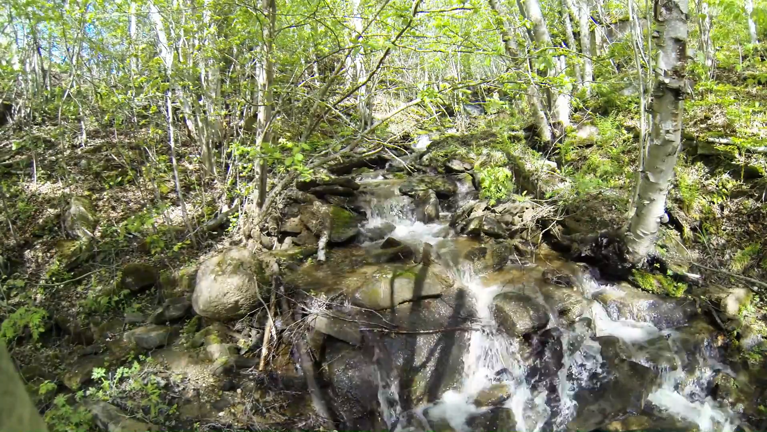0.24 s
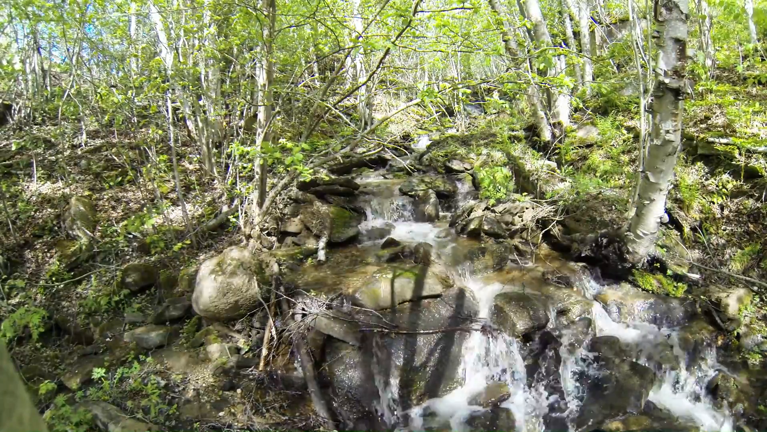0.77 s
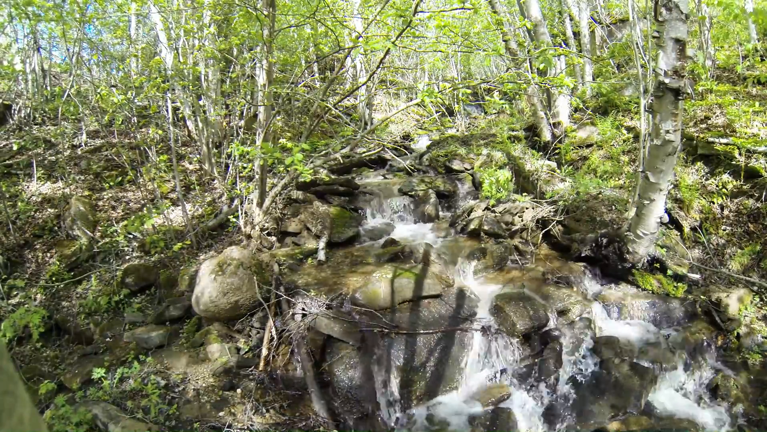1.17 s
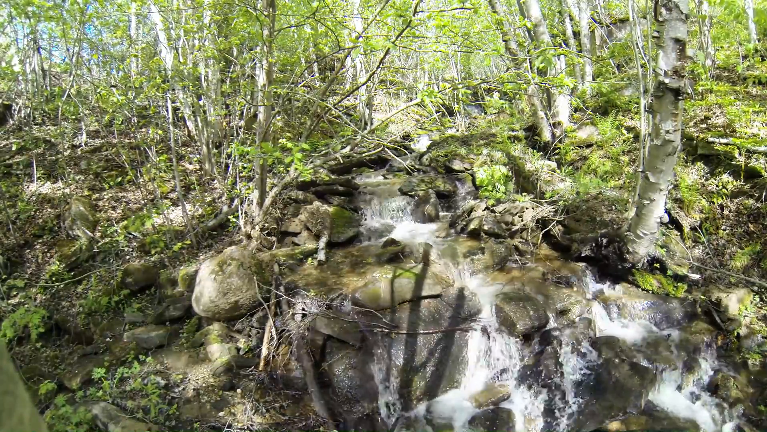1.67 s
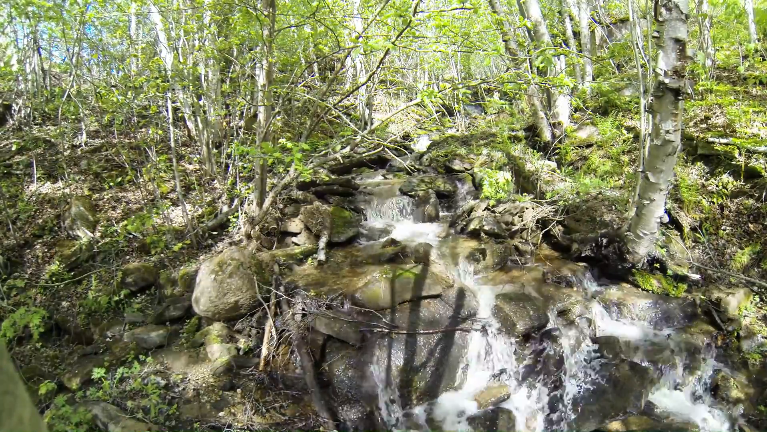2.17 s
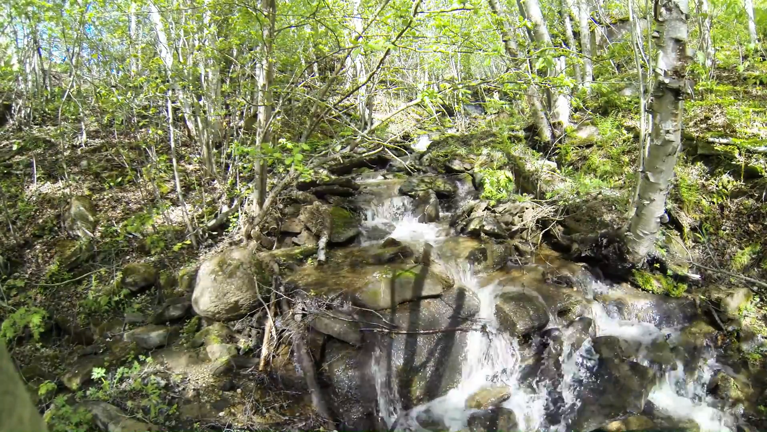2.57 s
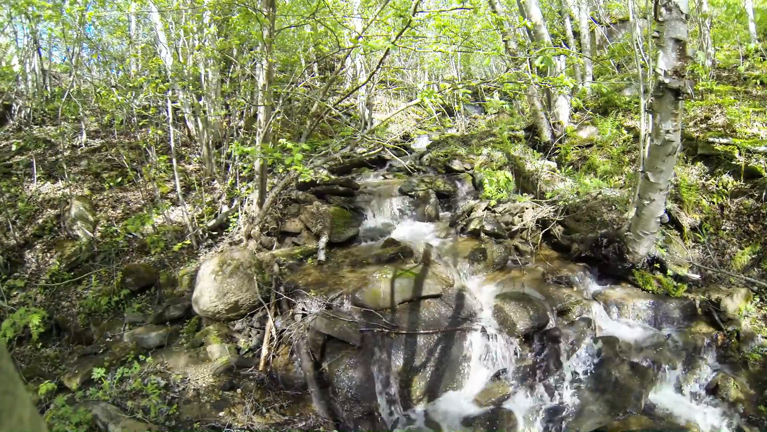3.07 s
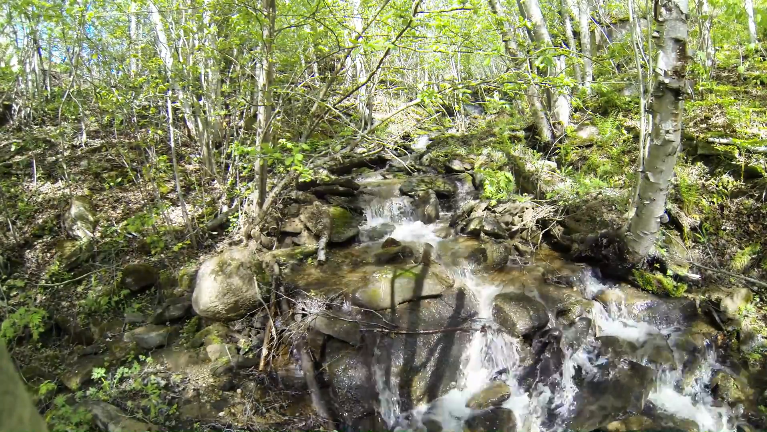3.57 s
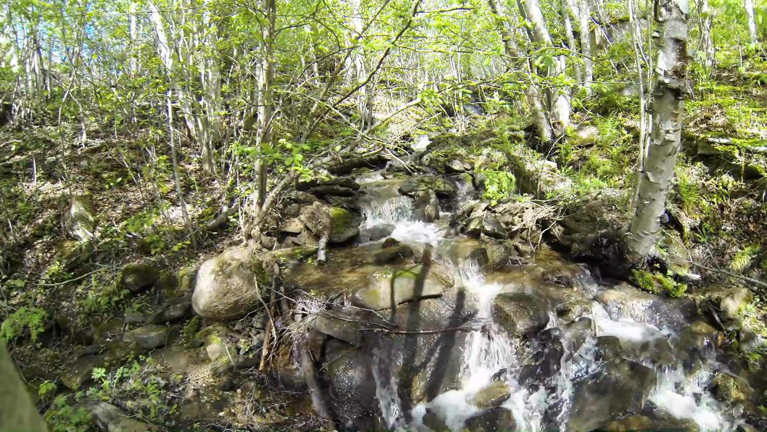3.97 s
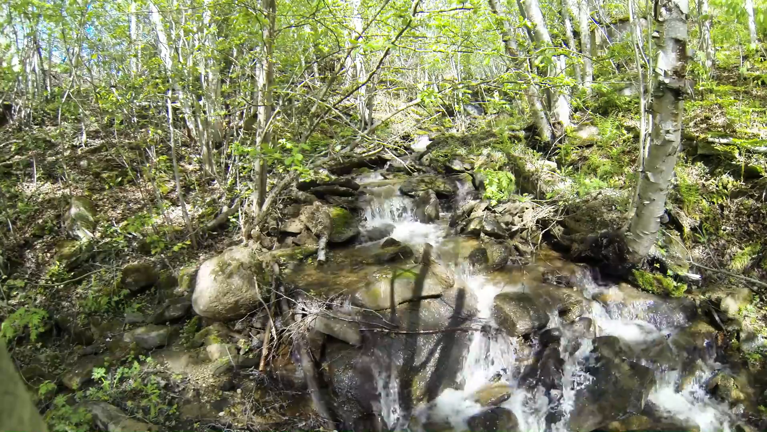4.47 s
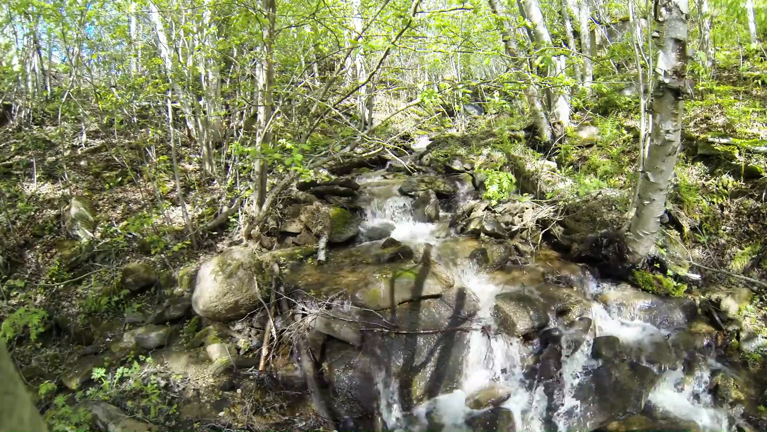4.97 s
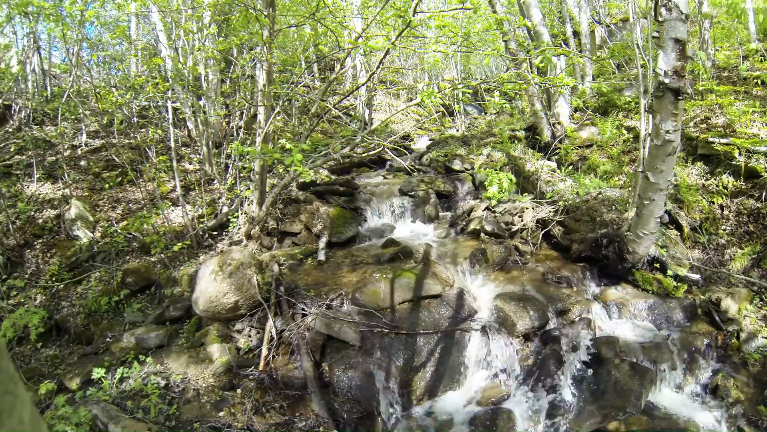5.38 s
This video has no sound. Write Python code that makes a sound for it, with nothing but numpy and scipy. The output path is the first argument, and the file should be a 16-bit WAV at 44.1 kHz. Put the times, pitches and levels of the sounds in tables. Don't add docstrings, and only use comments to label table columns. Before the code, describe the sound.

A small stream tumbles down rocks close in front of a boxed-in camera microphone. A steady low roar from plunging water and a fizzing midrange-treble spray run throughout, with slight quick slops. Single gurgles, high plinks and sharp drips stand out near, while soft wind buffeting fades after the first second. Practically mono, outdoors and dry.

```python
import sys
import numpy as np
from scipy import signal
from scipy.fft import rfft, irfft
from scipy.io import wavfile
from scipy.ndimage import uniform_filter1d

SR = 44100
rng = np.random.default_rng(int(sys.argv[2]) if len(sys.argv) > 2 else 0)


def nominal_scale(level):
    x = np.asarray(level, float) / 20
    return 10 ** x


def generate_wav(sig):
    pcm = np.round(np.clip(np.atleast_2d(sig).T, -1, 1) * 32767).astype(np.int16)
    wavfile.write(sys.argv[1], SR, pcm)


N = 248724

# (time [s], flow [dB])
FLOW = [(0, 0), (.3, -0.5), (.55, 0.8), (.9, -0.5), (1.5, 0), (2.0, -0.5), (2.3, 1.1), (2.5, -0.2),
        (3.0, 0), (3.6, -0.3), (4.2, -0.5), (4.33, 1.5), (4.5, -0.8), (5.1, .2), (5.64, 0)]
# (time [s], extra level [dB])
SLOPS = [(0.11, 3), (0.5, 0.5), (0.8, 1.5), (1.1, 2), (1.77, 2.5), (1.93, 4), (2.32, 1), (2.61, 1),
         (2.67, 1), (3.08, 2.5), (3.29, 1.5), (3.71, 1.5), (4.34, 0.5), (4.57, 4.5), (5.06, 3), (5.56, 2)]
# (frequency [Hz], density [dB per Hz])
ROAR_TONE = [(12, -44), (48, -32), (76, 0.5), (147, 0.5), (188, -6.5), (236, -2.5), (300, -4.5),
             (363, -1.5), (800, -3.5), (1000, -7.5), (1330, -17), (1780, -24.5), (2400, -27), (4000, -120)]
# (frequency [Hz], density [dB per Hz])
FIZZ_TONE = [(1000, -34), (1500, -7.5), (1810, -10), (2100, -4), (2470, 0), (2800, -2.5), (3400, -5),
             (3870, -10.5), (4600, -10), (5480, -13.5), (8680, -14.5), (10500, -20), (12200, -26.5),
             (14000, -38)]
# (time [s], peak [dB], pitch [Hz])
GULPS = [(0.126, -24, 118), (1.092, -19, 109), (1.471, -17.5, 111), (2.17, -18, 138), (2.849, -18, 107),
         (3.266, -12, 118), (4.631, -15, 144), (4.986, -22, 136), (0.93, -20, 90), (1.87, -19, 95),
         (3.0, -18, 100), (4.1, -18, 140), (4.32, -17, 100)]
# (time [s], peak [dB], pitch [Hz])
GURGLES = [(0.349, -14.5, 524), (0.485, -21, 495), (0.567, -18, 353), (0.603, -19, 550), (1.002, -21, 286),
           (1.181, -26, 463), (1.452, -11, 676), (1.665, -36, 557), (1.927, -15, 560), (2.316, -13, 620),
           (2.659, -18, 361), (2.823, -18, 630), (2.949, -23, 584), (3.49, -12.5, 843), (3.7, -16, 654),
           (3.939, -15, 537), (4.421, -18.5, 517), (4.557, -18, 563), (4.757, -15, 577), (4.801, -29, 684),
           (2.2, -17, 700), (2.35, -18, 557), (2.75, -18, 550), (3.272, -16, 270), (4.04, -16.5, 300),
           (4.29, -16, 600), (4.33, -17, 520), (5.22, -17, 271), (5.31, -14.5, 255)]
# (time [s], peak [dB], pitch [Hz])
PLINKS = [(0.183, -17, 2860), (0.3117, -18, 2950), (0.3682, -13, 3060), (0.7721, -16, 2510),
          (0.9062, -15, 3210), (1.2326, -16, 2480), (1.2965, -21, 2650), (1.8642, -14, 2780),
          (1.9629, -19, 2430), (2.0014, -16, 2620), (2.2912, -14, 2850), (2.5441, -18, 2480),
          (2.7397, -16, 2350), (2.7866, -17.5, 2520), (3.2789, -17, 2400), (3.4186, -23, 2640),
          (4.1799, -12.5, 2660), (4.4837, -17, 2840), (4.776, -17, 2960), (4.8055, -14, 2540),
          (4.889, -17, 2570), (4.9096, -20, 2620), (5.0853, -20, 2390), (5.3988, -15, 2490),
          (5.4953, -15, 2500)]
# (time [s], peak [dB], centre [Hz])
SNAPS = [
    (0.197, -16, 6930),
    (2.2169, -22, 7450),
    (2.3116, -24, 6310),
    (2.82, -21, 6240),
    (2.8817, -15, 8260),
    (3.5274, -20, 6020),
    (3.8127, -18, 6480),
    (4.5246, -16, 6490),
    (4.7012, -24, 6370),
    (5.505, -25, 7100),
]
# (time [s], half length [s], level [dB])
GUSTS = [
    (0.3, .08, -39),
    (0.45, 0.08, -30),
    (0.6, .07, -40),
    (1.1, 0.13, -38),
    (3.15, .2, -50),
    (4.21, 0.089, -43),
    (5.05, .12, -47),
]
# (frequency [Hz], level [dB])
BREEZE_TONE = [(8, -14), (18, 0), (35, -8), (60, -5.5), (110, -36), (200, -72)]
# (start [s], end [s])
DRIFTS = [
    (1.08, 1.82),
    (1.9, 2.4),
]
# (frequency [Hz], level [dB])
MIST_TONE = [(12300, -30), (13000, -3), (13600, 0), (14100, -5),
             (14600, -4), (14710, 5), (14820, -4), (15300, -30)]
# (frequency [Hz], step [dB])
COARSE = [(8600, -52), (9700, -40), (10500, -34), (11300, -32.5), (15000, -33)]
# (time [s], side level [dB], low [Hz], high [Hz])
SPREADS = [
    (3.012, -38, 4630, 6400),
    (3.012, -39, 7500, 10100),
    (3.592, -40, 6900, 8400),
]


def roar():
    water = wash(patch_db=-0.03, flicker_db=-0.6, frames_wide=19, bins_wide=3.5)
    bubbles = nominal_scale(-15.5) * swarm(149.6, 2017, per_s=500, cycles=6.4, spread_db=1.5)
    pour_db = 0.83 * flow_db() + slops_db()
    thud_db = -0.79 * pour_db + 1.2 * surge(1.508, 15)
    plunge = sway(colour(water + bubbles, ROAR_TONE), 187, "low", thud_db)
    return nominal_scale(-24 + pour_db + 0.27 * surge(2.5, 18)) * plunge


def fizz():
    water = wash(patch_db=1.0, flicker_db=.5, frames_wide=5.4, bins_wide=14)
    bubbles = nominal_scale(-7.5) * swarm(1720, 13400, per_s=3500, cycles=5.6, spread_db=2.5)
    spray_db = 0.28 * surge(6.5, 24)
    splash = sway(colour(water + bubbles, FIZZ_TONE), 3000, "high", spray_db)
    level_db = -28.5 + .3 * flow_db() + .2 * slops_db() + 0.28 * surge(6.5, 25)
    return nominal_scale(level_db) * splash


def singles():
    out = np.zeros(N)
    # (events, cycles of decay, pitch glide, trim [dB])
    kinds = ((GULPS, 2.5, .03, -4), (GURGLES, 6.0, .04, -5), (PLINKS, 9.0, .03, -4), (SNAPS, 4.5, .02, -3))
    for table, cycles, glide, trim_db in kinds:
        for s, peak_db, hz in table:
            add(out, s, nominal_scale(peak_db + trim_db) * bubble(hz, cycles, glide))
    return out


def breeze():
    dies_db_per_s, calm_db = 5.5, -47.5
    swings = colour(rng.standard_normal(N), BREEZE_TONE)
    t = np.arange(N) / SR
    push = nominal_scale(-39.5 - dies_db_per_s * t) + nominal_scale(calm_db)
    for s, half_s, db in GUSTS:
        push += nominal_scale(db) * np.exp(-((t - s) / half_s) ** 2)
    return push * swings


def mist():
    near_db, faint_db, edge_s = -58.5, -73, .06
    t = np.arange(N) / SR
    near = sum(np.clip(np.minimum(t - start, end - t) / edge_s + .5, 0, 1) for start, end in DRIFTS)
    return nominal_scale(faint_db + (near_db - faint_db) * near) * colour(rng.standard_normal(N), MIST_TONE)


def wash(patch_db, flicker_db, frames_wide, bins_wide):
    frames = N // 128 + 8
    real, imaginary, patches = rng.standard_normal((frames, 257, 3)).T
    patches = uniform_filter1d(patches, int(bins_wide), 0)
    patches = evened(uniform_filter1d(patches, int(frames_wide), 1))
    flicker = evened(uniform_filter1d(rng.standard_normal(frames), size=5))
    spectra = (real + 1j * imaginary) * nominal_scale(patch_db * patches + flicker_db * flicker)
    return evened(signal.istft(spectra, nperseg=512, noverlap=384)[1][:N])


def swarm(low_hz, high_hz, per_s, cycles, spread_db, count=24):
    bursts = rng.random(N) < per_s / SR
    size = nominal_scale(spread_db * np.minimum(rng.exponential(1, N), 4)) * bursts
    kind = rng.integers(0, count, N)
    out = np.zeros(N)
    for k, hz in enumerate(np.geomspace(low_hz, high_hz, count)):
        ring = bubble(hz, cycles, glide=.12)
        ring = ring * np.sqrt(hz) / np.linalg.norm(ring)
        out += signal.oaconvolve(size * (kind == k), ring)[:N]
    return evened(out)


def bubble(hz, cycles, glide):
    u = np.arange(int(4 * cycles * SR / hz) + 8) * hz / SR / cycles
    tone = np.sin(2 * np.pi * cycles * (u + glide * u ** 2 / 2))
    ring = tone * np.exp(-1.5 * u) * (1 - np.exp(-8 * u))
    return ring / abs(ring).max()


def flow_db():
    times, db = np.transpose(FLOW)
    swell = np.interp(np.arange(N) / SR, times, db)
    return swell - swell.mean()


def slops_db():
    rise_s, fall_s = 0.0075, 0.017
    t = np.arange(0, N + 64, 64) / SR
    times, extra_db = np.transpose(SLOPS)
    lag = t - times[:, None]
    shape = np.exp(-np.where(lag < 0, -lag / rise_s, lag / fall_s))
    return np.interp(np.arange(N) / SR, t, extra_db @ shape)


def surge(low_hz, high_hz, count=30):
    hz = np.geomspace(low_hz, high_hz, count)
    t = np.arange(0, N + 256, 256) / SR
    waves = np.sin(2 * np.pi * (np.outer(t, hz) + rng.random(count)))
    swell = (waves / np.sqrt(hz)).sum(1)
    return np.interp(np.arange(N) / SR, t, evened(swell))


def sway(x, edge_hz, kind, db):
    part = signal.sosfiltfilt(signal.butter(3, edge_hz, kind, fs=SR, output="sos"), x)
    return x + (nominal_scale(db - db.mean()) - 1) * part


def colour(x, points):
    f, db = np.transpose(points)
    hz = np.fft.rfftfreq(N, 1 / SR)
    gain = nominal_scale(np.interp(np.log(hz + 1), np.log(f + 1), db))
    return evened(irfft(rfft(x) * gain, N))


def evened(x):
    return x / np.sqrt(np.mean(x ** 2) + 1e-20)


def add(mix, s, sound):
    part = mix[max(round(s * SR), 0):][:len(sound)]
    part += sound[:len(part)]


def scene():
    mono = roar() + fizz() + singles() + breeze() + mist()
    return np.array([mono, mono])


def round_top(x, wobble_db, dead_zone, size=1024):
    n, k = np.arange(2 * size), np.arange(400, 720)
    basis = np.cos(np.pi / size * np.outer(n + .5 + size / 2, k + .5))
    basis *= np.sqrt(2 / size) * np.sin(np.pi * (n + .5) / (2 * size))[:, None]
    frames = N // size + 2
    padded = np.pad(x, (size, (frames + 1) * size - N - size), "reflect")
    starts = np.arange(frames) * size
    values = padded[starts[:, None] + n] @ basis
    step_db = np.interp((k + .5) * SR / (2 * size), *np.transpose(COARSE))
    drift_db = .8 * surge(.4, 4)[np.minimum(starts, N - 1), None]
    step = nominal_scale(step_db + drift_db + wobble_db * rng.standard_normal((frames, 1)))
    rounded = np.sign(values) * np.floor(abs(values) / step + 1 - dead_zone) * step
    blocks = (rounded - values) @ basis.T
    return x + (blocks[1:, :size] + blocks[:-1, size:]).ravel()[:N]


def spread():
    side = np.zeros(N)
    for s, db, low_hz, high_hz in SPREADS:
        band = signal.butter(6, [low_hz, high_hz], "band", fs=SR, output="sos")
        hiss = evened(signal.sosfilt(band, rng.standard_normal(2048)))
        add(side, s, nominal_scale(db) * hiss * np.hanning(2048) ** 4)
    return side


def top_cut(x):
    return signal.sosfilt(signal.butter(12, 14900, fs=SR, output="sos"), x)


def record(dry):
    mono = round_top(dry[0], wobble_db=1.1, dead_zone=.6)
    side = spread()
    fade_s = .004
    mono = mono * np.minimum(np.arange(N)[::-1] / SR / fade_s, 1)
    return top_cut(np.array([mono + side, mono - side]))


dry = scene()
out = record(dry)
generate_wav(out)
```